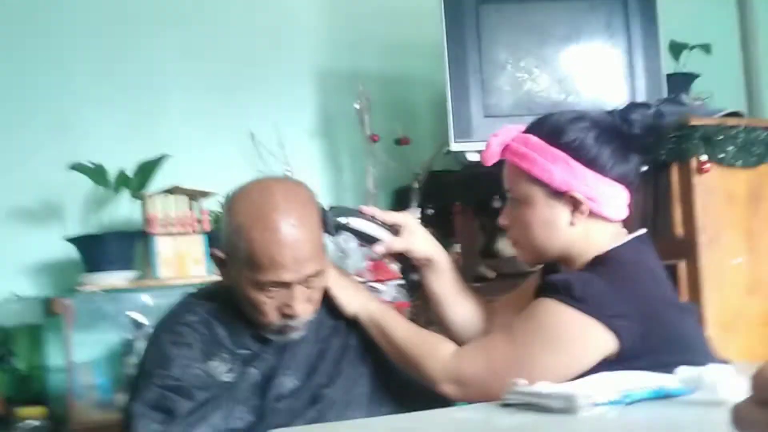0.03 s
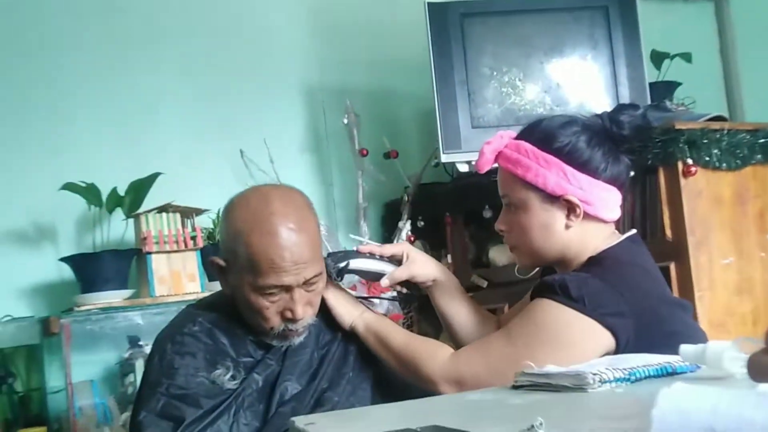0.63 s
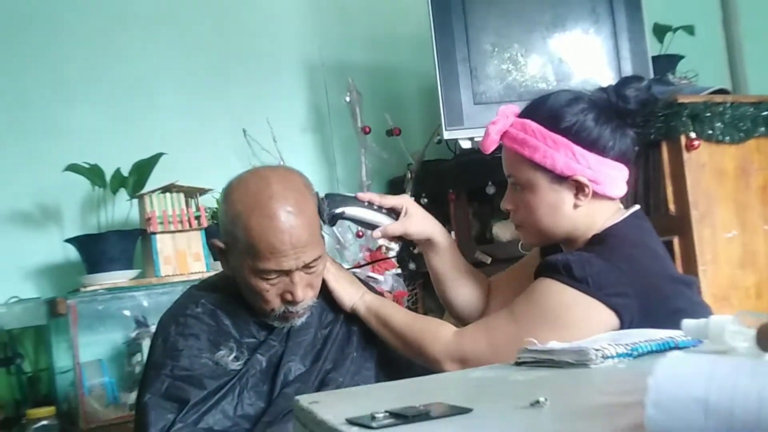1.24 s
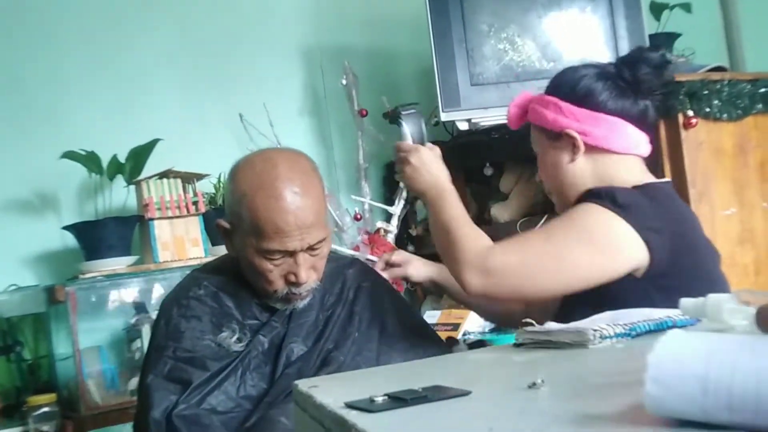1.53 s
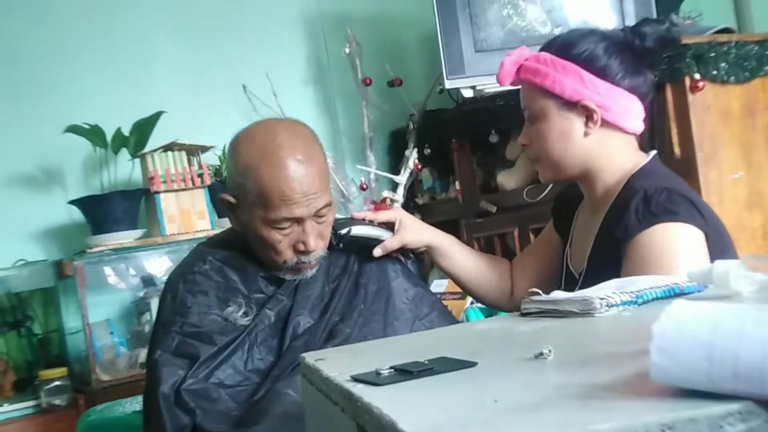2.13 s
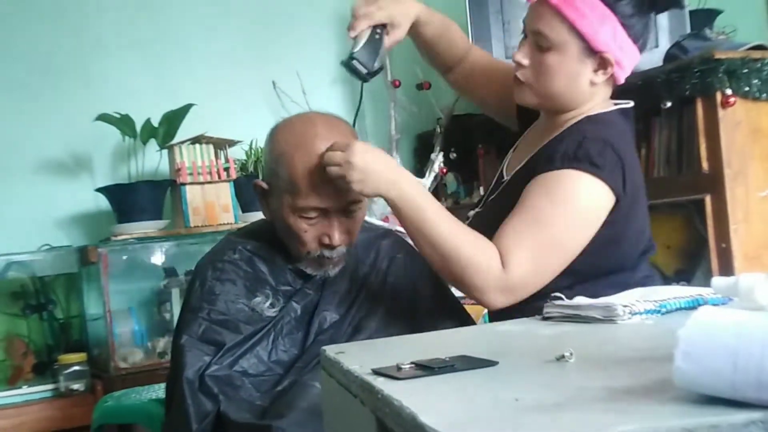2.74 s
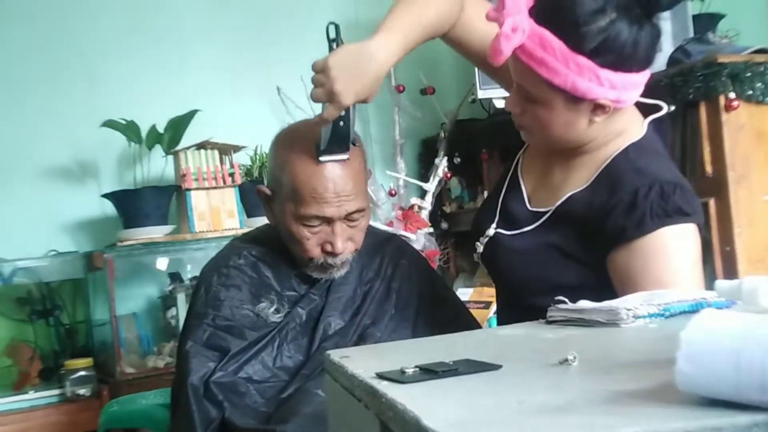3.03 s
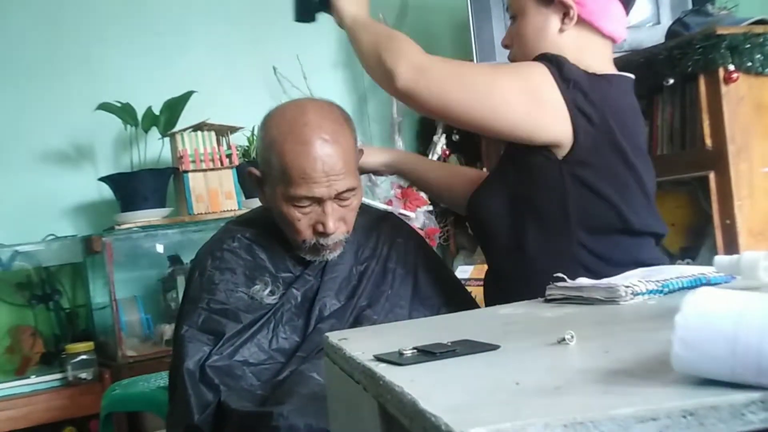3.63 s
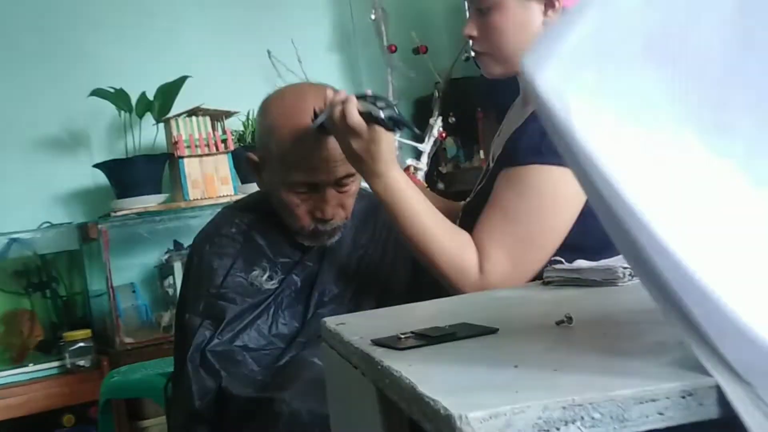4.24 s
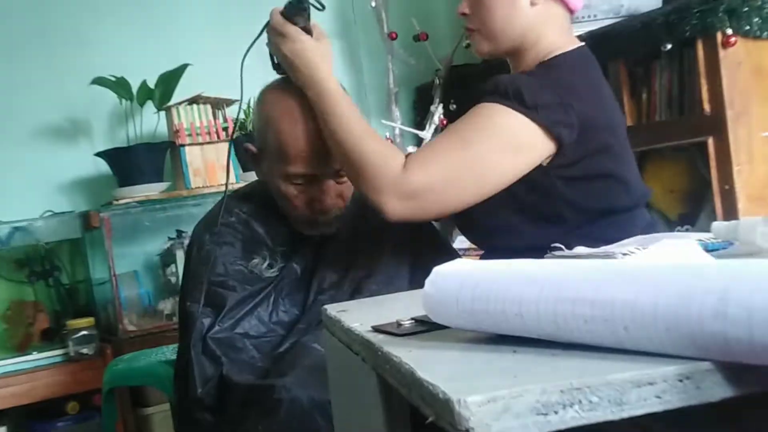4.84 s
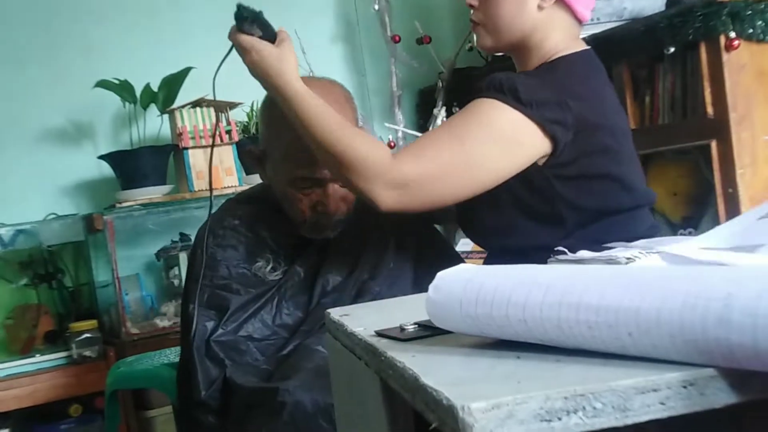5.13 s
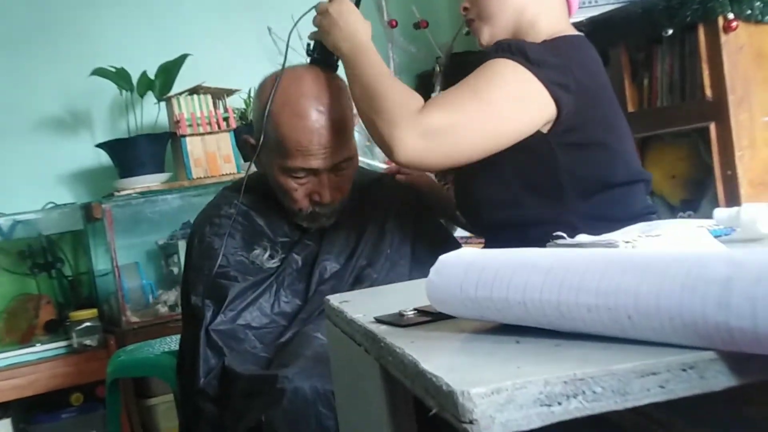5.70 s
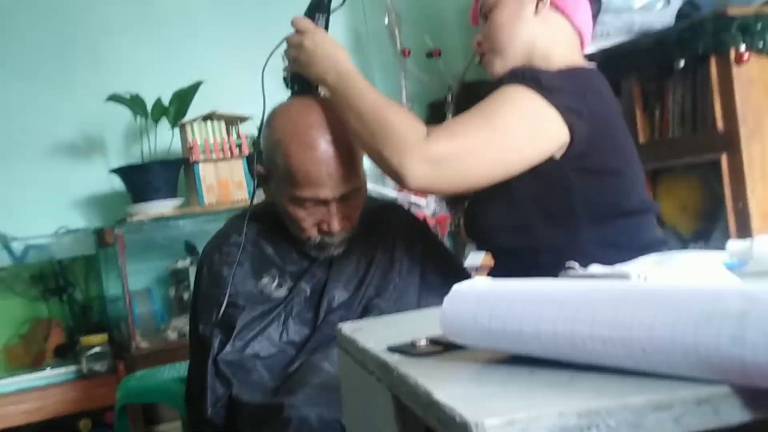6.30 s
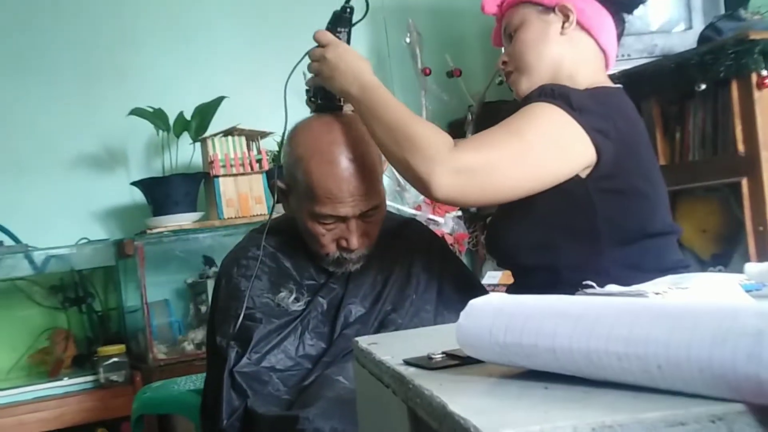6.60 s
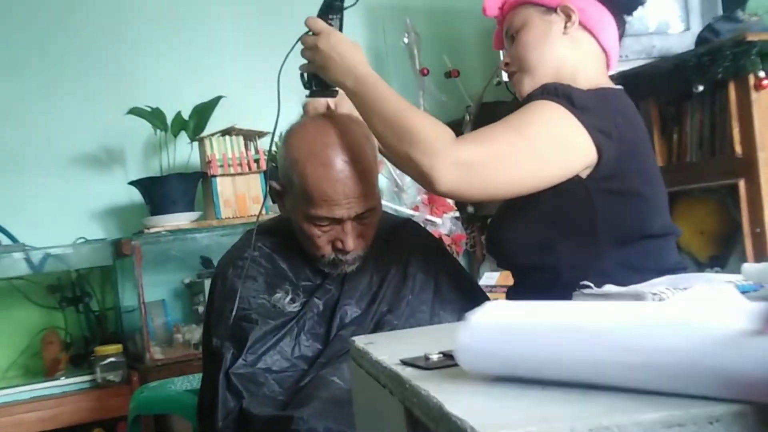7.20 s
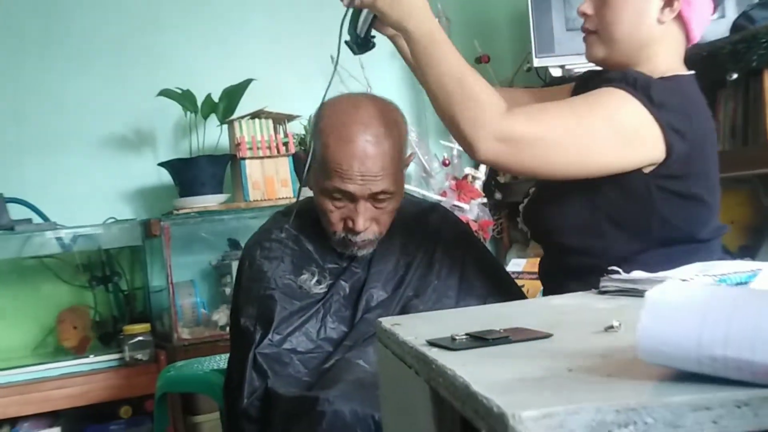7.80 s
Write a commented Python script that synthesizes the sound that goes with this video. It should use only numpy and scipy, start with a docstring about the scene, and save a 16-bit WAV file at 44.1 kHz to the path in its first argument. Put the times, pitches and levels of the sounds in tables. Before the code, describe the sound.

Electric hair clippers buzz without a break in a small, dry room, a metre or two away, their thin, hissy tone shifting as they move. Right at the hand-held microphone, fingers make many dull little bumps and clusters of short high squeaks. Around the middle, paper crinkles and snaps briefly. A dull knock and a few light clacks follow, then more squeaks and bumps over the buzz.

```python
"""Electric clippers buzz in a small room, moved about a head a metre or two from a hand-held phone.
Their blade clacks once a stroke, the housing rings and the teeth hiss. Right at the two microphones
the grip keeps shifting: dull little bumps on the phone's case, and squeaks, probably of skin
slipping on it. Paper rustles and snaps as it buckles; there are a few light clacks and one
heavier knock."""
import sys
import numpy as np
from scipy import signal
from scipy.fft import rfft, irfft
from scipy.io import wavfile
from scipy.ndimage import uniform_filter1d

SR = 44100
rng = np.random.default_rng(int(sys.argv[2]) if len(sys.argv) > 2 else 0)


def transcribe(signal):
    """Save signal, clipped to [-1, 1], as a 16-bit WAV file at the path in sys.argv[1]."""
    frames = np.atleast_2d(signal).T
    limited = np.clip(frames, -1, 1)
    pcm = np.round(limited * 32767).astype(np.int16)
    wavfile.write(sys.argv[1], SR, pcm)


N = 346336
TIME = np.arange(N) / SR
ROOM_T60_S, CUTOFF_HZ = 0.11, 15500

# The room's own background. Each row: frequency in Hz, relative level in dB.
ROOM_TONE_COLOUR = [(25, -24), (60, -20), (180, 4), (350, 48), (700, -12), (1500, -43), (4000, -3),
                    (15000, -33)]

# A roll of paper crinkles as it is lifted past the phone. Each row: time in seconds, relative level in dB.
CRINKLE_LEVEL = [(3.3, -53), (3.38, -44.5), (3.43, -33), (3.506, -42.5), (3.7, -43), (3.83, -47),
                 (3.95, -66), (4.24, -46.5), (4.6, -52)]
# Small creases crackle high, broad ones low. Each entry: a band edge in Hz.
CREASE_BANDS_HZ = [1000, 2800, 5500, 9500, 15000]
# Brushes and flicks of cloth or paper.
# Each row: time of the peak in seconds, level in dB, fading time in seconds, upper edge in Hz.
BRUSHES = [(.174, -45, 0.026, 7000), (2.325, -36.5, 0.031, 9000), (3.444, -29.5, 0.019, 15000),
           (3.559, -34.5, 0.012, 13000), (3.662, -37.5, 0.04, 15000), (3.829, -37, 0.013, 11000),
           (4.067, -33, 0.019, 15100), (4.235, -46.5, 0.0085, 7040), (4.81, -45, 0.015, 8000),
           (5.141, -37.5, 0.015, 6950), (5.306, -44, 0.015, 8000), (5.375, -40, 0.013, 1470),
           (5.64, -48, 0.021, 7000), (6.47, -40.5, 0.028, 5800)]
# The rubbing noise in brushes and snaps. Each row: frequency in Hz, relative level in dB.
RUB_COLOUR = [(200, -16), (600, -0.5), (2000, 4.5), (4000, 7.5), (8000, 8), (13000, 9), (15500, -9)]
# Sharp snaps as the paper buckles.
# Each row: time of the peak in seconds, level in dB, fading time in seconds, centre in Hz.
SNAPS = [(3.434, -27, 0.0059, 6000), (3.63, -32, .002, 11000), (3.636, -29, .006, 11000),
         (3.712, -29, 0.011, 7100), (3.741, -31, .003, 6000), (3.784, -33, 0.0062, 2860),
         (3.906, -35, 0.0056, 9000), (4.063, -32, 0.0046, 6970)]

# Light, hard clacks, perhaps of plastic. Each row: start in seconds, level in dB.
CLACKS = [(0.034, -31.5), (4.485, -34), (5.8742, -21), (6.468, -28)]
# Their ring. Each row: frequency in Hz, relative level in dB, seconds to fall by 60 dB.
CLACK_MODES = [(1150, 2, 0.025), (1530, -4.5, 0.029), (1844, -5.5, 0.03), (2600, 4, 0.013),
               (3350, 8, 0.0071), (6000, -28, 0.028)]
# The two blows of the heavy knock. Each row: start in seconds, peak in dB.
KNOCK_BLOWS = [(5.069, -9.5), (5.0722, -20)]
# The knock's resonances. Each row: frequency in Hz, width in Hz, gain in dB.
KNOCK_MODES = [(455, 72, -6.5), (647, 71, -3), (1350, 790, 7.5)]

# Fingers bump the case beside one microphone or the other.
# Each row: time in seconds, level in dB, left over right in dB.
BUMPS = [(0.218, -29, -25), (0.299, -29.5, 25), (0.324, -27.5, 10), (0.36, -27.5, 12), (0.54, -28, 23),
         (0.665, -27.5, 25), (0.755, -24, 29), (0.784, -32, 25), (1.057, -30, -25), (1.078, -22.5, 4),
         (1.117, -28.0, 19), (1.145, -25, -9), (1.22, -22.5, -18), (1.234, -25.5, 16), (1.257, -30, 18),
         (1.28, -24, 21), (1.302, -28.5, 17), (1.353, -27, 25), (1.394, -35, 25), (1.43, -26, -25),
         (1.467, -24, 20), (1.511, -28, 0), (1.535, -26.5, 11), (1.546, -28.5, 6), (1.664, -29, 25),
         (1.721, -24.5, 11), (1.807, -26.5, -23), (1.862, -27.0, 12), (1.88, -30, 20), (1.893, -27.0, 25),
         (1.963, -24.5, 23), (2.003, -28.5, 25), (2.021, -27.5, -7), (2.077, -27, -6), (2.149, -27.5, -17),
         (2.234, -26, 9), (2.256, -27, 0), (2.304, -24.5, -2), (2.336, -29.0, 16), (2.35, -29, 23),
         (2.377, -30.5, 25), (2.447, -26.5, -25), (2.521, -27, 21), (2.715, -28.5, -25),
         (2.936, -26.5, -26), (3.011, -25, 24), (3.032, -25.5, -10), (3.049, -30, 14), (3.113, -25.5, 8),
         (3.217, -27, 11), (3.281, -29.5, 20), (3.319, -25.5, 25), (3.383, -30, 18), (3.452, -26.5, 8),
         (3.582, -29.0, 25), (3.595, -25.5, 25), (3.663, -26, 12), (3.85, -30, 23), (3.942, -28, 17),
         (3.955, -28.0, 20), (3.966, -25, 19), (4.125, -24.5, 24), (4.141, -20, 25), (4.16, -26, 25),
         (4.331, -22.5, 24), (4.346, -21, -15), (4.395, -28.5, 25), (4.437, -30.5, 25), (4.585, -30.0, -25),
         (4.635, -29.5, 9), (4.796, -33, -25), (4.812, -31.5, -24), (5.105, -23.5, 14), (5.254, -24, 6),
         (5.459, -30.5, -9), (5.537, -27, -25), (5.681, -28.5, -24), (5.943, -28, 24), (5.989, -23.5, 14),
         (6.004, -30, -2), (6.016, -32, 9), (6.143, -28.5, -8), (6.597, -30.0, 27), (6.758, -28.5, 9),
         (6.788, -28, 18), (6.8, -25, 24), (6.891, -28, -15), (6.943, -19, 25), (6.955, -26, 25),
         (7.0, -30.5, 23), (7.049, -23, 25), (7.065, -23, 24), (7.078, -31, 19), (7.095, -26, 23),
         (7.13, -22.5, 25), (7.152, -22.5, 15.5), (7.168, -21.5, 20), (7.194, -25, 25), (7.209, -22.5, 23),
         (7.254, -19.5, 23), (7.269, -33.5, -17), (7.304, -24, -23), (7.611, -29, 23), (7.783, -31.5, -25)]
# The grip's restlessness, which sets off smaller bumps. Each row: time in seconds, relative level in dB.
GRIP_UNREST = [(0.0, -75), (0.5, -70), (0.76, -50), (1.0, -59.5), (1.29, -47.5), (2.25, -50.5),
               (2.71, -54.5), (3.1, -50), (4.4, -51), (4.52, -58.5), (4.9, -61), (6.1, -53), (6.52, -61.5),
               (6.8, -46.5), (7.3, -51.5), (7.7, -59)]
# Resonances of the phone's case. Each row: frequency in Hz, width in Hz, gain in dB.
CASE_MODES = [(418, 204, 5.5), (590, 260, -0.5)]
# One narrow resonance that the fingers do not shift: frequency in Hz, width in Hz, gain in dB.
CASE_RING = (1070, 40, -20)
# Slips of skin on the case. Each row: start in seconds, length in seconds, level in dB, swell over the
# slip in dB, pitch in Hz at the start, midway and at the end, centre of brightness in Hz, roughness 0-1.
SQUEAKS = [ (0.75, 0.11, -53, -5, 2440, 3390, 2730, 3000, 0.6),
           (1.257, 0.047, -28, -12, 2340, 2470, 2780, 4200, 0.43),
           (1.3, 0.026, -28.5, -10, 1984, 1850, 1740, 3800, 0.85),
           (1.327, 0.043, -19, 8, 2460, 2180, 2410, 4200, 0.02),
           (1.361, 0.034, -19, -9, 2230, 2520, 2860, 7200, 0.4),
           (1.395, 0.02, -21.5, -7, 3430, 4075, 3970, 4000, 0.2),
           (1.569, 0.024, -29.5, -5, 1480, 1590, 1520, 5400, 0.62),
           (1.587, 0.078, -34, 3, 2238, 2476, 2380, 2860, 0.45),
           (1.617, 0.014, -11.5, 0, 2410, 2370, 2420, 4800, 0.22),
           (1.668, 0.046, -27.5, -6, 2416, 2040, 1680, 3580, 0.33),
           (1.711, 0.025, -39.5, 1, 1820, 1590, 1440, 1910, 0.4),
           (2.158, 0.045, -44.5, 5, 1720, 1385, 1300, 2900, 0.85),
           (2.203, 0.031, -35.5, 10, 1840, 1755, 1800, 3100, 0.5),
           (2.295, 0.06, -34, 10, 1602, 1267, 1020, 2910, 0.84),
           (2.354, 0.047, -36, 8, 1175, 1099, 910, 2430, 0.6),
           (2.404, 0.051, -27, -8.5, 971, 1015, 1256, 2870, 0.4),
           (2.509, 0.053, -38.5, -10, 1420, 1333, 1160, 1820, 0.45),
           (2.622, 0.071, -25, -1.5, 1590, 2385, 1800, 2900, 0.2),
           (2.694, 0.022, -29, -2, 2010, 1960, 1800, 2600, 0.36),
           (2.72, 0.081, -28, -10, 1905, 1822, 1216, 2950, 0.28),
           (3.027, 0.014, -36, -5, 1320, 1300, 1210, 2680, 0.7),
           (3.048, 0.056, -23.5, -3, 1510, 1605, 1440, 3960, 0.33),
           (3.103, 0.044, -33, -7, 1360, 1166, 1166, 1720, 0.1),
           (4.637, 0.034, -51.5, -2, 2470, 2800, 3020, 2600, 0.6),
           (5.992, 0.016, -35.5, -10, 2230, 1910, 1600, 2090, 0.66),
           (6.02, 0.012, -26, -10, 2030, 1790, 1840, 1940, 0.53),
           (6.052, 0.01, -29, -2, 1690, 1520, 1430, 1400, 0.2),
           (6.749, 0.013, -27.5, -14, 1223, 1192, 1090, 2250, 0.84),
           (6.77, 0.038, -19.5, -4, 1314, 1079, 1270, 3480, 0.18),
           (6.801, 0.05, -26.5, -5, 1324, 1350, 950, 2020, 0.14),
           (6.853, 0.013, -25, -16, 1100, 1057, 1050, 3280, 0.5),
           (6.877, 0.048, -30, -10, 1030, 1014, 1270, 2260, 0.3),
           (6.993, 0.022, -34, -17, 1490, 1430, 1410, 1500, 0.4),
           (7.024, 0.034, -23.5, -2, 1984, 1795, 1700, 1710, 0.65),
           (7.049, 0.03, -31, -18, 1610, 1465, 1490, 2130, 0.42),
           (7.084, 0.03, -30, -11, 1495, 1610, 1620, 1870, 0.54),
           (7.11, 0.057, -37.5, -8, 1320, 1306, 1480, 2200, 0.62),
           (7.167, 0.014, -31.5, -2, 1710, 1653, 1690, 2750, 0.8),
           (7.366, 0.052, -33.5, -8, 1266, 1224, 1020, 4400, 0.28),
           (7.599, 0.15, -46.5, -2, 4660, 4930, 4410, 4760, 0.16)]
# How the case passes a squeak's partials. Each row: frequency in Hz, relative gain in dB.
SQUEAK_COLOUR = [(1200, 8.5), (2300, 1.5), (3200, 6.5), (4600, 8), (6200, 4), (7600, 7), (9600, 13),
                 (13000, 6)]

# The pace of the clippers' motor. Each row: time in seconds, blade strokes per second.
STROKE_RATE = [(0, 357.5), (4.7, 357.6), (5.3, 358.1), (6.1, 358.0), (7.4, 357.5), (7.85, 357.6)]
# The motor's low harmonics. Each row: time in seconds, relative level in dB.
HUM_LEVEL = [(0, -50), (3.3, -50.5), (4.6, -61), (7.85, -62)]
# The housing's ring swells and dips as the hand turns, strongest upright on the crown of the head.
# Each row: time in seconds, relative level in dB.
HOUSING_LEVEL = [(0.0, -52), (0.18, -48), (0.27, -55), (0.34, -46.5), (0.9, -47), (1.08, -57.5),
                 (1.14, -48.5), (1.54, -43), (1.96, -48.5), (2.05, -55), (2.19, -46.5), (2.48, -39.5),
                 (2.56, -46), (2.98, -53), (3.04, -42.5), (3.17, -54), (3.23, -43.5), (3.61, -45),
                 (4.21, -50), (4.64, -42.5), (4.76, -49), (4.88, -43.5), (4.98, -50), (5.12, -38),
                 (5.26, -41.5), (5.4, -37.5), (5.57, -44.5), (5.8, -36.5), (6.12, -38), (6.64, -39),
                 (7.24, -43.5), (7.42, -47), (7.48, -38), (7.86, -45)]
# Now and then the hand shades the housing's lowest partials, and its ring thins and moves upward.
# Each row: time in seconds, gain of those partials in dB.
HAND_SHADE = [(4.45, -4), (4.7, -10), (4.95, -7), (5.12, 1.5), (5.27, -9), (5.37, -1), (5.5, -2),
              (5.6, -15), (5.86, 0)]
# The blades' ring as the clippers turn in the hand.
# Each row: time in seconds, relative level of the lower ring in dB, of the upper ring in dB.
BLADE_LEVELS = [(0.0, -40, -40), (0.1, -42, -42), (0.22, -33.5, -42.5), (0.28, -44.5, -41),
                (0.52, -35.5, -38.5), (0.81, -39, -41.5), (1.02, -37, -41.5), (1.2, -48, -44.5),
                (1.26, -44, -40.5), (1.72, -42, -41), (1.77, -36, -39), (1.93, -37.5, -45),
                (2.05, -46.5, -41), (2.23, -38.5, -41.5), (2.9, -41.5, -38.5), (3.04, -42, -43.5),
                (3.19, -50, -47), (3.41, -49.5, -39.5), (3.67, -38.5, -39.5), (3.97, -43, -41.5),
                (4.31, -36, -38), (4.53, -40, -35), (4.68, -41, -43.5), (5.06, -42.5, -37.5),
                (5.63, -39, -40), (5.76, -39, -36), (6.3, -43, -39.5), (6.66, -39, -39.5),
                (7.05, -42.5, -40.5), (7.3, -51, -41.5), (7.47, -46, -36.5), (7.86, -55, -37)]
# Colours of the buzz, of the teeth's hiss and of the housing's loose rattle.
# Each row: frequency in Hz, relative level in dB.
BUZZ_COLOUR = [(358, -16.5), (720, -35), (1070, -19.5), (1430, -32), (2150, -25), (2500, -17),
               (3150, -24.5), (3600, -13.5), (4290, -14), (4650, -1), (5050, -5), (5700, -14.5),
               (6080, -14), (6500, -23.5), (7500, -25), (7900, -18.5), (9200, -3), (10700, -12.5),
               (12200, -6), (13400, -14.5), (15200, -13)]
HISS_COLOUR = [(200, -20), (400, -11), (1500, -18.5), (2700, -6.5), (3800, -15.5), (7200, -10), (8800, 6),
               (12000, 7.5), (13600, 3.5), (15500, -1.5)]
RATTLE_COLOUR = [(3900, -24), (4600, 4), (5400, 1), (6100, -14), (7400, -5), (9000, -50)]


def from_db(db):
    return 10 ** (np.asarray(db) / 20)


def rms_one(x):
    return x / np.sqrt(np.mean(x ** 2) + 1e-20)


def in_time(rows):
    s, *columns = np.transpose(rows)
    return [np.interp(TIME, s, column) for column in columns]


def at_hz(colour, hz):
    points_hz, db = np.transpose(colour)
    return np.interp(np.log(hz), np.log(points_hz), db)


def pan(left_over_right_db):
    """Gains at the left and right microphones, at constant total power."""
    return rms_one(from_db(np.array([[left_over_right_db], [-left_over_right_db]]) / 2))


def cut(x, hz, kind, order=2):
    sos = signal.butter(order, np.clip(hz, 10, .45 * SR), kind, fs=SR, output="sos")
    return signal.sosfilt(sos, x + 1e-18)


def drift(per_s, time=TIME):
    """A random wander of spread 1 that turns about per_s times a second."""
    knots = rng.standard_normal(int(per_s * (time[-1] - time[0])) + 2)
    return rms_one(np.interp(time, np.linspace(time[0], time[-1], len(knots)), knots))


def flare(s, rise_s, fade_s):
    """An envelope that swells to 1 at time s and dies away."""
    return np.exp(-np.minimum(np.abs(TIME - s) / np.where(TIME < s, rise_s, fade_s), 20))


def noise(colour):
    """Coloured noise, unrelated at the two microphones."""
    hz = np.maximum(np.fft.rfftfreq(N, 1 / SR), 1)
    return rms_one(irfft(rfft(rng.standard_normal((2, N))) * from_db(at_hz(colour, hz)), N))


def resonate(x, modes, top_hz=1100):
    """Parallel resonances, scaled so that a unit click peaks at 1; soft contacts carry little treble."""
    def body(force):
        out = 0
        for hz, width, db in modes:
            radius = np.exp(-np.pi * width / SR)
            feedback = [1, -2 * radius * np.cos(2 * np.pi * hz / SR), radius ** 2]
            out = out + from_db(db) * signal.lfilter([1, 0, -1], feedback, force + 1e-18)
        return cut(cut(out, 399, "high", order=4), top_hz, "low", order=4)
    return body(x) / np.abs(body(signal.unit_impulse(SR // 20))).max()


def room_tone():
    """The faint, steady background of the room."""
    return from_db(-60) * noise(ROOM_TONE_COLOUR)


def room_echo(x):
    """Near walls return a short diffuse tail, different at each microphone, duller than the source."""
    t = TIME[:SR // 2]
    tail = cut(rng.standard_normal((2, len(t))), 8300, "low", order=1)
    tail *= from_db(-60 * t / ROOM_T60_S) * (t > .004)
    return signal.fftconvolve(x, tail / np.sqrt(np.sum(tail ** 2) / 2), axes=1)[:, :N]


def rumble(contacts):
    """A faint deep flutter at the microphones that comes and goes with the shaking of the case."""
    shaking = np.sqrt(np.abs(uniform_filter1d(np.mean(contacts ** 2, axis=0), SR // 60)))
    deep = rms_one(cut(rng.standard_normal((2, N)), 160, "low", order=1))
    return from_db(-27.5) * shaking * cut(deep, 360, "low") * pan(4.5)


def rustle(grain_db=2.0, creases_per_s=210, crease_s=0.0056, crease_spread_db=5.5):
    """Paper passing the phone crackles in many creases and a few snaps; brushes swell and fade."""
    rub = noise(RUB_COLOUR)
    rub = rms_one(rub + 0.53 * rub[::-1])   # partly alike at the two microphones
    rub *= rms_one(from_db(grain_db * drift(700)))
    crinkle = 0
    for band in zip(CREASE_BANDS_HZ, CREASE_BANDS_HZ[1:]):
        folds = rng.random(N) < creases_per_s / SR
        sizes = from_db(crease_spread_db * np.clip(rng.standard_normal(N), -2, 2))
        decays = signal.lfilter([1], [1, -np.exp(-1 / (crease_s * SR))], folds * sizes + 1e-18)
        crinkle = crinkle + cut(rub, band, "band") * decays
    s, db = np.transpose(CRINKLE_LEVEL)
    out = rms_one(crinkle) * np.interp(TIME, s, from_db(db - 1.5), left=0, right=0)
    for s, db, fade_s, top_hz in BRUSHES:
        out += from_db(db) * flare(s, 0.015, fade_s) * rms_one(cut(rub, top_hz, "low"))
    for s, db, fade_s, hz in SNAPS:
        out += from_db(db) * flare(s, 0.0011, fade_s) * rms_one(cut(rub, [hz / 2, hz * 2], "band"))
    return out


def clacks(ring_db=-10.0, crack_s=0.0016):
    """Hard contacts near the centre: a short crack, then the brief ring of the struck part."""
    t = TIME[:SR // 10]
    out = np.zeros(N)
    for s, db in CLACKS:
        sound = cut(rng.standard_normal(len(t)), [2200, 9000], "band") * np.exp(-t / crack_s)
        for hz, mode_db, t60 in CLACK_MODES:
            decay = from_db(ring_db + mode_db - 60 * t / t60)
            sound += decay * np.sin(2 * np.pi * hz * t) * rng.choice([-1, 1])
        out[int(s * SR):][:len(t)] += from_db(db) * sound
    return out * pan(1.0)


def knock():
    """Two dull blows in quick succession, heard alike at both microphones."""
    clicks = np.zeros(N)
    for s, db in KNOCK_BLOWS:
        clicks[int(s * SR)] = from_db(db)
    return resonate(clicks, KNOCK_MODES, top_hz=910) * pan(0)


def case_bumps(stutter_db=-9, flurry_db=-12, small_per_s=240, spread_db=3.5, shift_octaves=0.17):
    """Bumps travel through the case to the nearer microphone; a crowd of small ones follows the grip."""
    clicks = np.zeros((2, N))
    flurry_power = 0
    for s, db, side_db in BUMPS:
        push = from_db(db) * pan(side_db)[:, 0]
        clicks[:, int((s - .002) * SR)] += push * rng.choice([-1, 1])
        # the finger stutters around the main bump
        for offset_s in (-rng.uniform(.002, .006), rng.uniform(.003, .009)):
            clicks[:, int((s + offset_s) * SR)] += push * from_db(stutter_db) * rng.choice([-1, 1])
        # small bumps crowd round each larger one
        flurry = from_db(db + flurry_db) * pan(side_db) * flare(s, rise_s=0.0091, fade_s=0.019)
        flurry_power += flurry ** 2
    grip = from_db(in_time(GRIP_UNREST)[0] + 6.5) * pan(2.8)
    unrest = np.sqrt(flurry_power + grip ** 2)
    sizes = from_db(spread_db * np.minimum(rng.exponential(1, (2, N)), 3)) * rng.choice([-1, 1], (2, N))
    small = sizes * (rng.random((2, N)) < small_per_s / SR) * from_db(1.9 * drift(35))
    clicks += small * unrest / resonate(small, CASE_MODES).std()
    # the resonances move up or down with the place and firmness of each touch
    shifts = 2 ** (shift_octaves * np.linspace(-1, 1, 3))
    touch = rng.integers(0, len(shifts), N)
    out = 0
    for k, shift in enumerate(shifts):
        modes = [(hz * shift, width, db) for hz, width, db in CASE_MODES] + [CASE_RING]
        out += resonate(clicks * (touch == k), modes, top_hz=1000 * shift)
    return out


def squeaks(catch_s=0.0048, release_s=0.0034, swell_db_per_octave=14.5, wobble=0.0715, rasp_db=-7):
    """Skin sticks and slips by the microphones: harmonics on a bending pitch, rasping when uneven."""
    out = np.zeros(N)
    for s, length, db, swell_db, start_hz, mid_hz, end_hz, bright_hz, rough in SQUEAKS:
        span = slice(int(s * SR), int((s + length) * SR))
        t = TIME[span]
        along = np.linspace(-.5, .5, len(t))
        pitch = np.polyval(np.polyfit([-.5, 0, .5], [start_hz, mid_hz, end_hz], 2), along)
        centre_hz = bright_hz * 2 ** (swell_db * along / swell_db_per_octave)   # brighter as it swells
        contact = np.clip((t - t[0]) / catch_s, 0, 1) * np.clip((t[-1] - t) / release_s, 0, 1)
        loudness = from_db(db + swell_db * along) * contact
        slip_rate = pitch * (1 + .007 * drift(150, t) + wobble * rough * drift(900, t))
        phase = 2 * np.pi * np.cumsum(slip_rate) / SR
        wave, power = 0, 0
        for k in range(1, 13):
            hz = k * pitch
            octaves = np.log2(hz / centre_hz)
            fall_db = np.where(octaves > 0, 19.5, 7.5) * np.abs(octaves)
            gain = from_db(at_hz(SQUEAK_COLOUR, hz) - fall_db + 3.66 * drift(110, t)) * (hz < CUTOFF_HZ)
            grain = 1 + .4 * rough * drift(1100, t)
            wave += gain * grain * np.sin(k * phase + rng.uniform(0, 2 * np.pi))
            power += gain ** 2 / 2
        rasp = cut(rng.standard_normal(len(t)), 0.7 * bright_hz, "high")
        rasp = rms_one(cut(rasp, 1.47 * bright_hz, "low", order=3))
        flutter = rms_one(from_db(1.76 * (.5 + rough) * drift(180, t)))
        out[span] += loudness * flutter * (wave / np.sqrt(power) + rough * from_db(rasp_db) * rasp)
    # through the case, partials near 8 kHz reach the two microphones out of step
    notched = signal.lfilter(*signal.iirnotch(8100, 7, fs=SR), out + 1e-18)
    return np.array([out, 2 * notched - out]) * pan(1.2)


def blade_buzz(stroke_phase, housing_db, lower_db, upper_db, shade_below_hz=4800, shade_lift=0.21):
    """One clack a stroke; each harmonic fades on its own as the room's reflections shift with the hand."""
    hum_db, = in_time(HUM_LEVEL)
    shade_db, = in_time(HAND_SHADE)
    stroke_hz = STROKE_RATE[0][1]
    coarse = TIME[::SR // 100]
    out = np.zeros((2, N))
    for k in range(1, int(CUTOFF_HZ / stroke_hz) + 1):
        hz = k * stroke_hz
        # reflected over direct sound: the weak overtones come mostly by way of the walls
        scatter = 1.2 if 2000 < hz < 4000 else .35 if hz < 7000 else .6
        ring_db = housing_db - 3 + shade_db * (1 if hz < shade_below_hz else -shade_lift)
        db = hum_db if hz < 4000 else ring_db if hz < 7000 else lower_db if hz < 10500 else upper_db
        gain = from_db(db + at_hz(BUZZ_COLOUR, hz)) * np.sqrt(2 / (1 + scatter ** 2))
        # short waves reach the two microphones out of step; the very top favours the right one
        right_lag = rng.normal(2.3, 0.95) if hz > 7000 else rng.normal(0, 0.35)
        sides = pan(5.5 if hz < 13000 else -5.0)
        phase = k * stroke_phase + rng.normal(0, 0.93)
        for microphone, side, lag in zip(out, sides, (0, right_lag)):
            along = np.interp(TIME, coarse, drift(9, coarse)) * scatter / np.sqrt(2)
            across = np.interp(TIME, coarse, drift(9, coarse)) * scatter / np.sqrt(2)
            microphone += side * gain * ((1 + along) * np.cos(phase - lag) + across * np.sin(phase - lag))
    return out


def clippers(jitter_rad=0.023, wander_rad=0.1, throb=0.86, waver_db=1.1):
    """A metre or two off, the blade buzzes; the teeth rub and the housing rattles on every stroke."""
    housing_db, = in_time(HOUSING_LEVEL)
    lower_db, upper_db = in_time(BLADE_LEVELS)
    rate, = in_time(STROKE_RATE)
    stroke_phase = 2 * np.pi * np.cumsum(rate) / SR + jitter_rad * drift(60) + wander_rad * drift(5.7)
    buzz = blade_buzz(stroke_phase, housing_db, lower_db, upper_db)
    bursts = rms_one(1 + throb * np.cos(stroke_phase))
    hiss = noise(HISS_COLOUR) * from_db((lower_db + upper_db) / 2 - 2.5)
    rattle = noise(RATTLE_COLOUR) * from_db(housing_db - 12)
    waver = from_db(waver_db * drift(36))   # the hand is never quite still
    return waver * (buzz + bursts * (hiss + rattle))


def scene():
    """The small room as heard from the phone: handling up close, the clippers farther off."""
    squeak, bumps, blow, clack = squeaks(), case_bumps(), knock(), clacks()
    to_walls = from_db(-10.5) * squeak + from_db(-13) * bumps + from_db(-8) * blow + from_db(-6) * clack
    echo = room_echo(to_walls)
    deep = rumble(bumps + blow)
    return clippers() + squeak + bumps + blow + clack + deep + rustle() + echo + room_tone()


def record(dry):
    """The phone cuts the top steeply."""
    return signal.sosfilt(signal.ellip(12, .1, 80, CUTOFF_HZ, fs=SR, output="sos"), dry)


dry = scene()
out = record(dry)
transcribe(out)
```